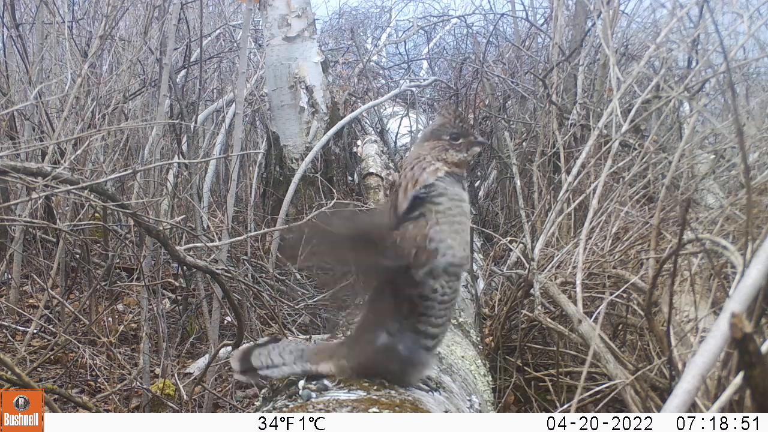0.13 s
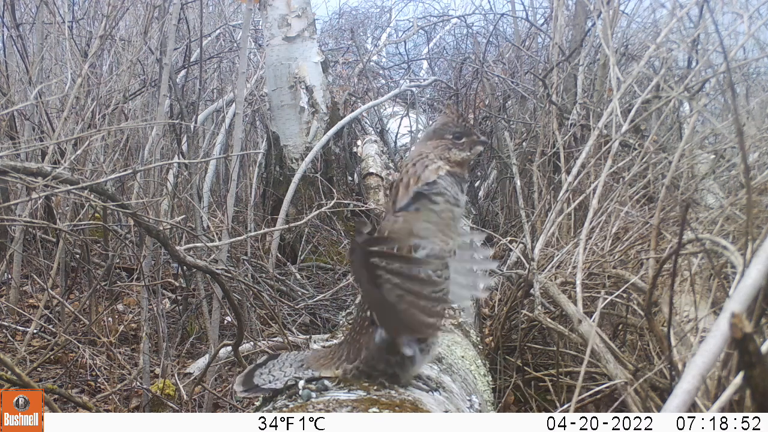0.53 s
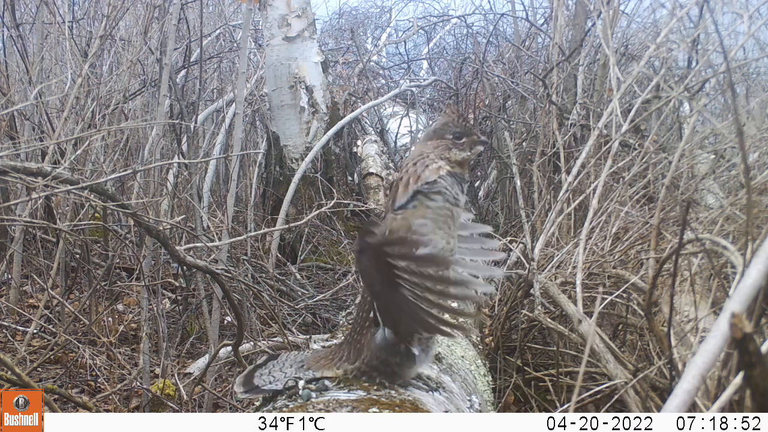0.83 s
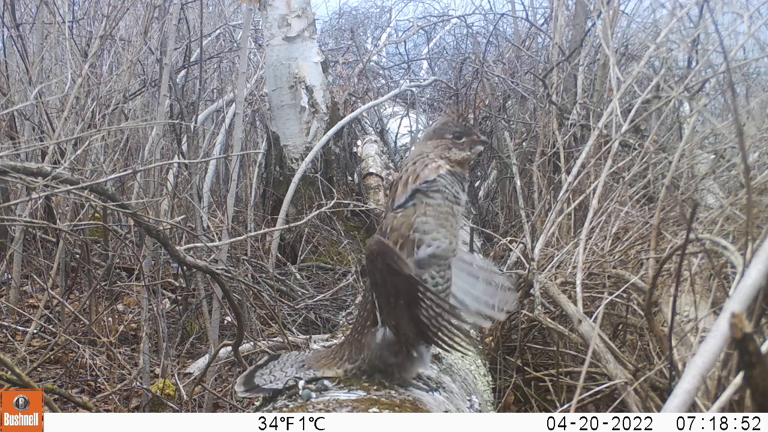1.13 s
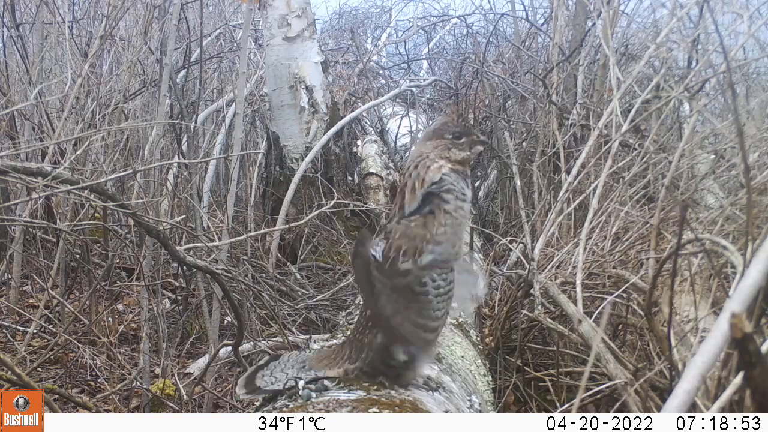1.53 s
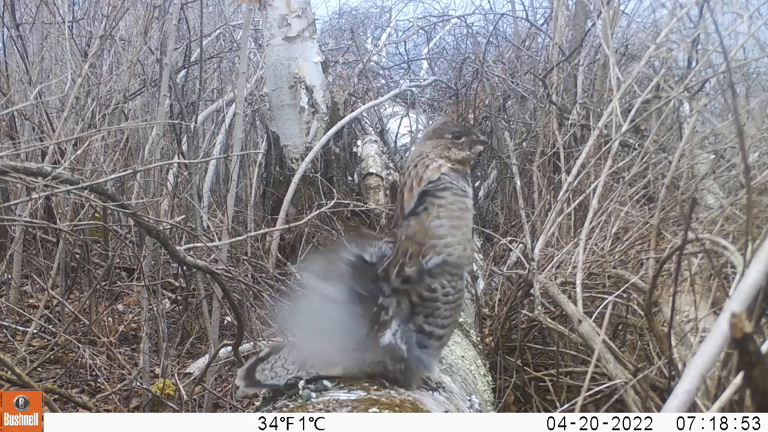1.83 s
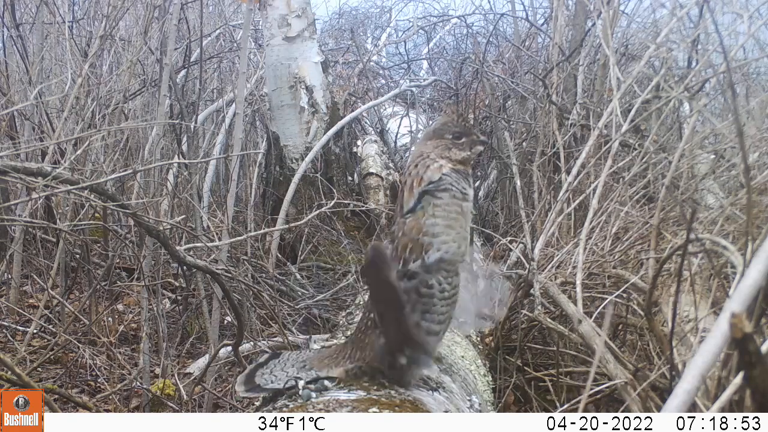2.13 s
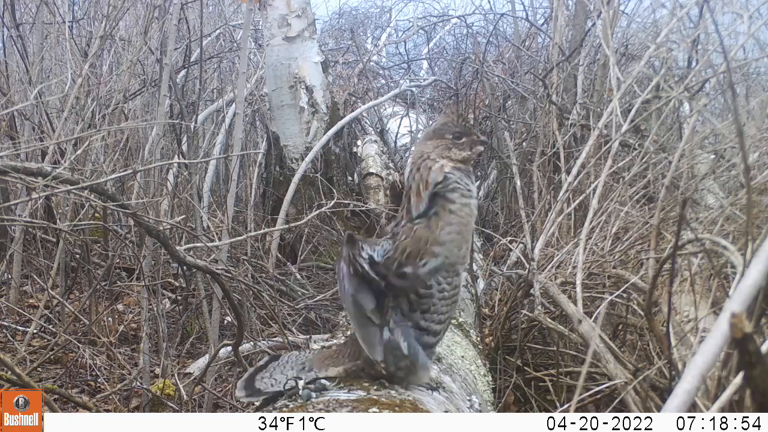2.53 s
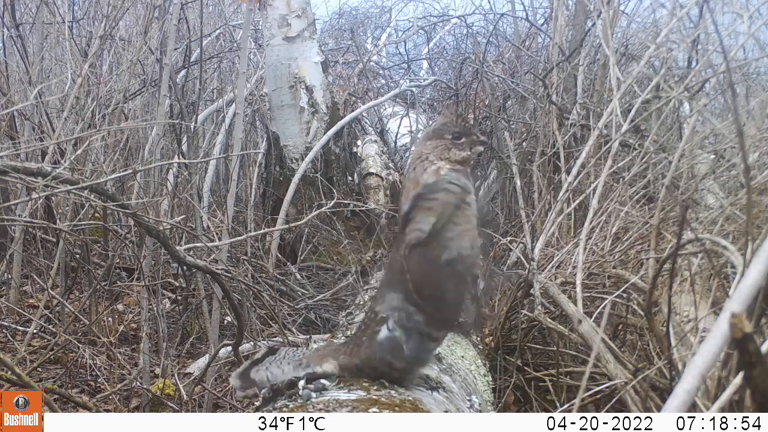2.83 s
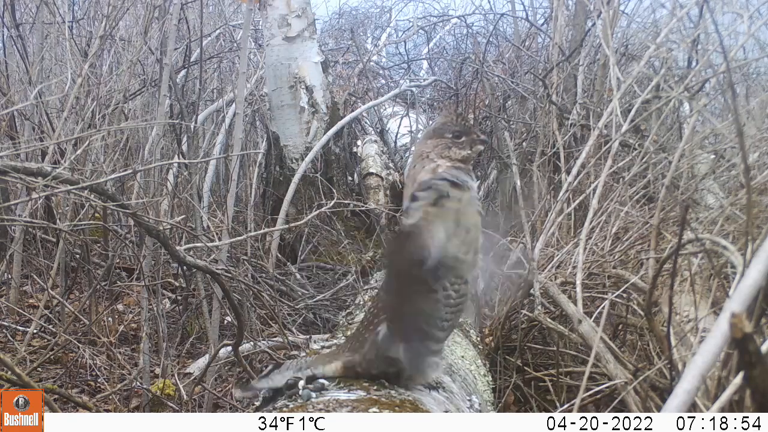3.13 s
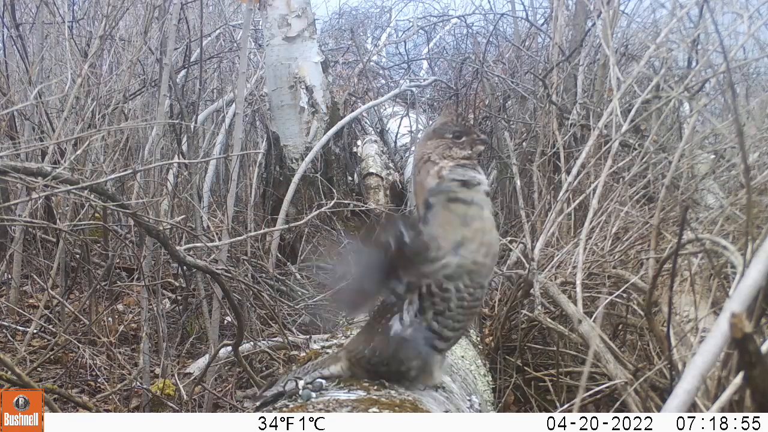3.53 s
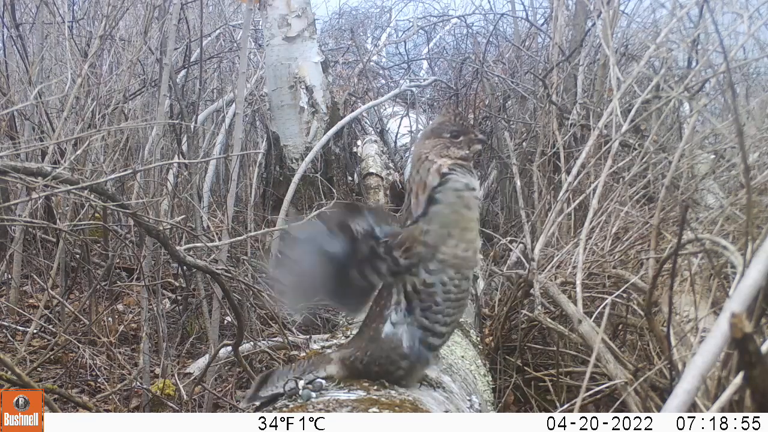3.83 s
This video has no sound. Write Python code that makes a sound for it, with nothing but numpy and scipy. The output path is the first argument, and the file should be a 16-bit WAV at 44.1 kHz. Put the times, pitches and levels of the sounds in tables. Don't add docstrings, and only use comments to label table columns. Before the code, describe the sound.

A grouse close to a small outdoor microphone drums its wings, low airy thumps with feather swishes, slow at first, then ever faster into a whir, over faint wind, hiss and distant songbirds in quiet woodland.

```python
import sys
import numpy as np
from scipy import signal
from scipy.fft import rfft, irfft
from scipy.io import wavfile
from scipy.ndimage import map_coordinates

SR = 44100
rng = np.random.default_rng(int(sys.argv[2]) if len(sys.argv) > 2 else 0)


def volts(x):
    e = np.asarray(x, float) / 20
    return 10 ** e


def pcm_store(signal):
    levels = np.round(np.clip(np.atleast_2d(signal), -1, 1) * 32767)
    wavfile.write(sys.argv[1], SR, levels.astype(np.int16).T)


N = 176400

# pitch_hz, level_db
HISS_COLOUR = [(150, -4), (300, -11), (900, -19.5), (1300, -22), (4800, -25.5), (6500, -24), (10500, -30),
               (15800, -29)]
WIND_COLOUR = [(15, 8), (30, 0.5), (55, -0.5), (90, -5), (140, -17), (250, -28.5), (500, -47.5)]
FLUTTER_COLOUR = [(120, 6), (450, -1), (960, 0.5), (1200, -7), (1550, -1), (2100, -10.5), (3200, -6.5),
                  (5200, -11)]
SWISH_COLOUR = [(3500, -29), (5300, -16.5), (6400, 2.5), (7300, -3.5), (9300, -12), (11300, -21),
                (12600, -29.5), (15800, -31)]
SHEEN_COLOUR = [(4500, -14), (6500, -2), (8500, -2), (11300, -6.5), (12700, -17.5), (15800, -22)]

# time_s, level_db
GUSTS = [(0.0, -45.5), (0.21, -50.5), (0.41, -53.5), (0.96, -49), (1.05, -48), (1.18, -54), (1.46, -53),
         (1.64, -56.5), (1.76, -51.5), (2.04, -63), (2.38, -54), (2.66, -54), (2.85, -59), (3.09, -59.5),
         (3.49, -49), (3.72, -78), (3.87, -56), (4.0, -59)]
# centre_s, swell_db, width_ms
BUFFETS = [
    (.05, -15, 19.4),
    (.1, 1.5, 18),
    (.16, -6, 30),
    (.35, 3.5, 25),
    (.446, 5, 19),
    (.75, 1.5, 16),
    (.856, -9, 7.4),
    (1.068, 1, 13),
    (1.32, -5.5, 39),
]

# time_s, pitch_hz, level_db
WHISTLE = [
    (0, 5680, -62),
    (.04, 5440, -63),
    (.1, 5240, -66),
    (.17, 5175, -61),
    (.225, 5230, -67),
    (.24, 5200, -85),
]
# start_s, length_s, from_hz, to_hz, level_db
CHIRPS = [(0.683, 0.037, 2980, 3020, -66), (0.706, 0.04, 2950, 2890, -61), (0.832, .03, 2920, 2880, -72),
          (0.693, 0.031, 2300, 2270, -69), (.07, .04, 2200, 2220, -75), (.11, .05, 2500, 2570, -75),
          (1.48, 0.071, 2200, 2230, -73), (1.667, 0.057, 2770, 2480, -68), (2.105, 0.044, 3350, 3550, -68),
          (2.262, 0.064, 3220, 3230, -64), (2.264, 0.039, 2640, 2750, -65)]
# start_s, peak_db, pitch_hz
TWIGS = [
    (1.051, -51.5, 1400),
    (1.3, -50.5, 1290),
    (1.911, -47.5, 1290),
    (2.098, -42, 1270),
    (2.549, -46, 7200),
]
# centre_s, swell_db, width_ms
LEAF_STIRS = [
    (.79, 5, 37),
    (1.02, 1, 25),
    (1.225, -3, 11),
    (1.29, 8, 22),
    (1.53, 11, 29),
    (1.75, 9, 22),
    (1.93, 4.5, 22),
    (2.10, 11.5, 36),
    (2.43, 7, 12),
]
# start_s, mic_ring_peak_db, quill_hz, quill_db
QUILL_TICKS = [
    (2.6278, -31, 3320, -36),
    (3.3972, -32, 2900, -41),
    (3.5492, -38, 4380, -47),
    (3.557, -28, 3120, -45),
    (3.639, -31, 3310, -52),
    (3.738, -30, 5350, -40),
    (3.781, -50, 5300, -37),
    (3.7875, -45, 3500, -36.5),
    (3.8449, -29, 2800, -34),
    (3.9097, -32, 3980, -31.5),
]
# start_s, level_db, flutter_share_db, trailing_swish_db
CRACKS = [
    (3.523, -44, -7, -3),
    (3.5828, -46, -3, 0),
    (3.641, -35, -15, -16),
    (3.689, -35, -18, -20),
    (3.7396, -36, -8, -20),
    (3.786, -44, -4, 0),
    (3.8436, -44, 6.5, -2),
    (3.910, -40, 0, -11),
    (3.981, -44.5, 3.5, -3),
]

# suction_trough_s, thump_db, feather_db, snap_lead_ms
STROKES = [(0.286, -24.5, -39, 19), (0.608, -25, -39, 14.8), (0.8991, -23, -39, 14.1),
           (1.1622, -26.5, -40, 16.4), (1.4013, -27, -37.5, 17.6), (1.619, -25.5, -39, 15.7),
           (1.8217, -26, -38.5, 11.8), (2.007, -26, -39, 12.5), (2.1779, -25, -37.5, 15.7),
           (2.3369, -25, -37.5, 16.2), (2.4838, -25, -38, 16), (2.6211, -25.5, -38, 16.5),
           (2.7488, -26, -39, 17), (2.8663, -28, -38.5, 19), (2.9782, -29.5, -39.5, 17.5),
           (3.0809, -28.5, -39, 22.3), (3.1741, -29.5, -39.5, 15.5), (3.2581, -29, -39, 13.5),
           (3.3392, -29.5, -39.5, 16), (3.4144, -28.5, -38.5, 21.3), (3.4814, -31, -39, 23),
           (3.5428, -28, -40.0, 8.8), (3.601, -27.5, -38.5, 17.2), (3.6544, -27, -39, 16.4),
           (3.7, -27.5, -39.5, 13), (3.7497, -26.5, -40.5, 13.6), (3.8086, -28.5, -39.5, 18.6),
           (3.8685, -29, -41, 20.4), (3.934, -29.5, -40.5, 20.6), (4.004, -46, -40.5, 20.6)]
# snap_db, sweep_db, clap_and_brush_db, flutter_db
STROKE_ACCENTS = [(0, 0, 1.5, 0.5), (0, -0.5, 1.5, -0.5), (0, 2, 1, 0.5), (2.5, 0, 3, 2.5),
                  (-0.5, -2, 0, -1), (-2.5, 0.5, 1, 1), (3.5, 1, 0.5, 0), (0, 1, -1, 0.5),
                  (-2.5, 1, -2.5, -1), (-1, -1.5, -0.5, -0.5), (-1.5, 0.5, -1, 0), (-1, 2.5, -2.5, -0.5),
                  (1.5, 1, 0.5, 0.5), (-1.0, -2, -1, -0.5), (3, 1, -2, 0), (-1, -0.5, -1.0, -0.5),
                  (3, -0.5, -1, -0.0), (-0.0, 0, 1, 1.5), (-1.5, 3.0, 0.5, 2), (-3.5, -0.5, -1, -2),
                  (-2.5, 0, -1, 1), (-5, -2, -0.5, 1), (-1, -2, -0.5, 0.0), (-0.5, -1, -1.5, -0.0),
                  (-3.5, -1.5, 1, 2), (0.5, -0.5, 1, 2.5), (0, -5, -0.5, -1), (3, -3, 0.5, 0.5),
                  (0, -2.5, -1, -0.5), (-4, 0, 0.5, 6)]
# thump_late_ms, push_share
STROKE_PUSHES = [(-.4, .7), (0, .9), (-.2, 1), (-1.6, .95), (-.2, 1.15), (0, 1.05), (-.8, .8), (0, 1.05),
                 (.6, 1.05), (-.4, 1.15), (.6, .95), (.6, .9), (.2, 1.1), (0, .9), (.4, .95), (-1.6, 1.15),
                 (-.8, 1.1), (.2, 1.2), (-1, 1.05), (-.6, 1.05), (-1.4, 1.1), (1.2, 1.05), (-.4, .95),
                 (.4, .9), (1.8, 1.05), (-.4, .95), (-2.6, .65), (0, .55), (-.2, .75), (0, .9)]
# from_trough_ms, rise_ms, fall_ms; the snap counts from its own start
PHASE_TIMES = [
    (-18, 18, 4),
    (2.8, 2.2, 3.2),
    (-3, 2.2, 3),
    (1, 3, 3.5),
    (6, 1.2, 2.4),
    (13.3, 3.8, 1.8),
    (19.5, 2.5, 3),
    (21, 3, 24),
]
# flutter_db, swish_db, sheen_db, change_db per stroke a second
PHASE_LEVELS = [
    (-32.5, -29, -28.5, 0.24),
    (-8, -15, -14.5, 0.293),
    (-7.5, 4, -10, -0.2664),
    (-5, -2.5, -11, 0.),
    (-0.5, -4, -6, -0.13),
    (-3, 2.5, -6.5, -0.3324),
    (-10, -14, -12, 0.3084),
    (-14.5, -17.5, -18, 0.1),
]
# from_trough_ms, width_ms, pressure_share
AIR_PULSE = [
    (-5.8, 2.0, .36),
    (0, 2.4, -.86),
    (6.2, 1.9, .49),
    (10.8, 2.1, .49),
    (14.8, 1.6, -.12),
    (0, .8, -.13),
]


def walk(hz):
    knots = rng.standard_normal(4000)
    return map_coordinates(knots, [np.arange(N) * hz / SR], order=1, mode="wrap")


def colour(table, ragged_db=0., flicker_hz=150):
    hz, db = np.array(table, float).T
    octave = np.log2(np.arange(N // 2 + 1) * SR / N + 1)
    shape_db = np.interp(octave, np.log2(hz), db, left=-60, right=-60)
    full = rfft(rng.standard_normal(N)) * volts(shape_db)
    x = np.zeros(N)
    for k in range(int(np.log2(hz[0])) - 1, int(np.log2(hz[-1])) + 3):
        band = irfft(full * np.maximum(1 - abs(octave - k), 0), N)
        x += band * volts(ragged_db * walk(flicker_hz))
    return x / x.std()


def bell(offset, width):
    return np.exp(-.5 * (offset / width) ** 2)


def hump(ms, rise, fall):
    return np.where(ms < 0, bell(np.minimum(ms, 0), rise), np.exp(-np.maximum(ms, 0) / fall))


def tone(hz, ms):
    return np.sin(2 * np.pi * hz * ms / 1000)


def glide(hz):
    return np.sin(2 * np.pi * np.cumsum(hz) / SR)


def add(out, at_s, shape, before=3000, after=7000):
    i = np.arange(max(int(at_s * SR) - before, 0), min(int(at_s * SR) + after, N))
    out[..., i] += shape((i / SR - at_s) * 1000)


def recorder_hiss():
    return colour(HISS_COLOUR) * volts(-64.5 + 0.57 * walk(5.0))


def wind(t):
    at, db = np.array(GUSTS).T
    lump_db = sum(swell * bell((t - centre) * 1000, width) for centre, swell, width in BUFFETS)
    level_db = np.interp(t, at, db) + lump_db + 3.0 + 1.2 * walk(17)
    return colour(WIND_COLOUR, ragged_db=3.0, flicker_hz=13) * volts(level_db)


def birds(t):
    at, hz, db = np.array(WHISTLE).T
    wobble = 1 + .007 * walk(150)
    fade = volts(3.2 * walk(80))
    out = volts(np.interp(t, at, db, right=-120)) * glide(np.interp(t, at, hz) * wobble)
    for start, length, from_hz, to_hz, db in CHIRPS:
        u = np.clip((t - start) / length, 0, 1)
        out += volts(db) * np.sin(np.pi * u) * glide((from_hz + (to_hz - from_hz) * u) * wobble)
    out = out * fade
    echo = np.roll(out, int(.016 * SR)) * volts(-5 + 3 * walk(40))
    return .7 * (out + echo)


def twigs():
    out = np.zeros(N)
    for at, db, hz in TWIGS:
        add(out, at, lambda ms: volts(db) * hump(ms, .15, .7) * tone(hz, ms))
    return out


def leaves():
    stir_db = np.zeros(N)
    for at, db, width in LEAF_STIRS:
        add(stir_db, at, lambda ms: db * bell(ms, width))
    swell_db, fleck_db = 1.6 * walk(8.4), 3.0 * walk(140)
    rustle = colour(SHEEN_COLOUR, ragged_db=2.5, flicker_hz=30)
    return rustle * volts(-74 + stir_db + swell_db + fleck_db)


def quills():
    mic_ring_hz, fall_ms = 6540, 0.68
    out = np.zeros(N)
    for at, ring_db, hz, db in QUILL_TICKS:
        add(out, at, lambda ms: hump(ms, .12, fall_ms) * (
            volts(ring_db) * tone(mic_ring_hz, ms) + volts(db) * tone(hz, ms)))
    return out


def add_stroke_phases(power):
    snap_fall_ms_per_hz, blur_per_hz, flutter_db_per_hz = 0.37, .035, -0.13
    scatter_db, scatter_ms = .9, .6
    chance = rng.standard_normal((40, 2, 8))
    rates_hz = 1 / np.gradient(np.array(STROKES)[:, 0])
    is_snap = np.arange(8) == 1
    for (at, _, db, lead), rate, (lates, sizes), accent in zip(STROKES, rates_hz, chance, STROKE_ACCENTS):
        snap, sweep, clap, low = accent
        blur = 1 + blur_per_hz * max(rate - 4, 0)
        times = np.array(PHASE_TIMES) + np.outer(is_snap, [-lead, 0, snap_fall_ms_per_hz * rate])
        accents = [(snap, snap)] * 2 + [(low, sweep)] * 2 + [(low, clap)] * 4
        for (m, rise, fall), (*mix, tempo_db), late, size, (own, bright) in zip(
                times, PHASE_LEVELS, lates, sizes, accents):
            level_db = db + tempo_db * rate + scatter_db * size + np.array(mix)
            level_db = level_db + [flutter_db_per_hz * rate + own, bright, bright]
            gain = volts(level_db)[:, None]
            middle = m + scatter_ms * late
            add(power, at, lambda ms: (gain * hump(ms - middle, rise * blur, fall * blur)) ** 2)


def add_cracks(power):
    for at, db, share_db, trail_db in CRACKS:
        gain = volts(db + np.array([[share_db], [0], [-7.0]]))
        add(power, at, lambda ms: (gain * hump(ms, 0.33, 1.1)) ** 2)
        add(power[1], at, lambda ms: (volts(db + trail_db) * hump(ms - 3, 2.2, 12)) ** 2)


def feathers():
    power = np.zeros((3, N))
    add_stroke_phases(power)
    add_cracks(power)
    flutter = colour(FLUTTER_COLOUR, ragged_db=2.0, flicker_hz=118.9)
    swish = colour(SWISH_COLOUR, ragged_db=1.0, flicker_hz=211)
    sheen = colour(SHEEN_COLOUR, ragged_db=-3.0, flicker_hz=179.5)
    crackle = volts(1.9 * walk(750))
    return np.sum(np.sqrt(power) * [flutter, swish, sheen], axis=0) * crackle


def thumps():
    lobes = AIR_PULSE + [(25.5, 2.3, -volts(-14))]
    scatter = .15 * np.array([0, 0, .6, .6, 2.5, 3, 2.7])
    out, chance = np.zeros(N), rng.standard_normal((40, 7))
    for (at, db, _, _), (late, push), c in zip(STROKES, STROKE_PUSHES, chance):
        uneven = [push, 1, 1, 1, 1, 1, 1] + scatter * c
        add(out, at, lambda ms: volts(db) * sum(
            u * p * bell(ms - late - m, w) for (m, w, p), u in zip(lobes, uneven)))
    return out


def scene():
    t = np.arange(N) / SR
    background = recorder_hiss() + wind(t) + birds(t) + twigs() + leaves()
    bird = quills() + feathers() + thumps()
    return (background + bird)[None]


def band_limit(x):
    return signal.sosfilt(signal.butter(12, 15920, fs=SR, output="sos"), x)


def record(dry):
    x = signal.sosfilt(signal.butter(1, 8, "high", fs=SR, output="sos"), dry)
    x = signal.sosfilt(signal.ellip(10, .2, 60, 15850, fs=SR, output="sos"), x)
    return band_limit(x)


dry = scene()
out = record(dry)
pcm_store(out)
```